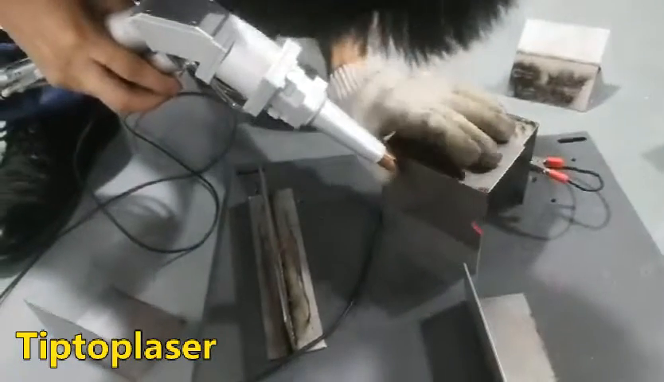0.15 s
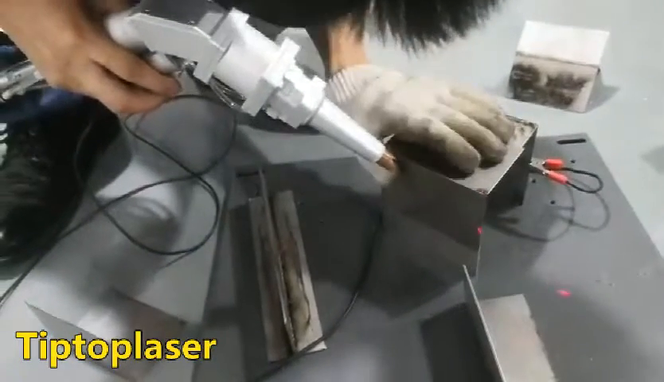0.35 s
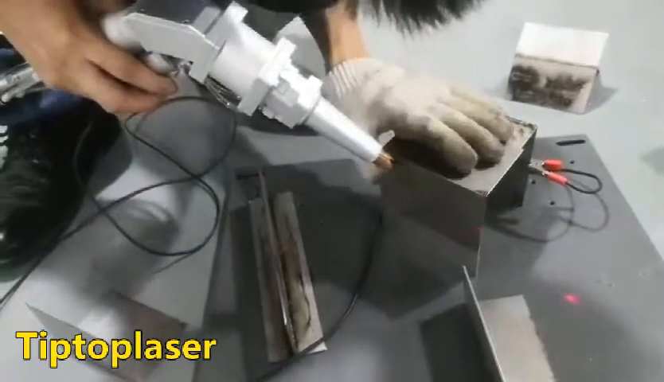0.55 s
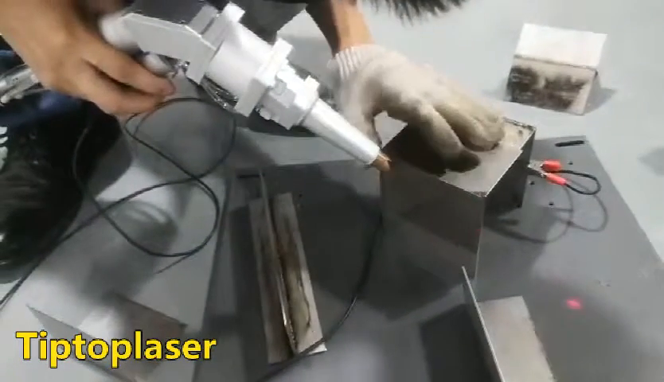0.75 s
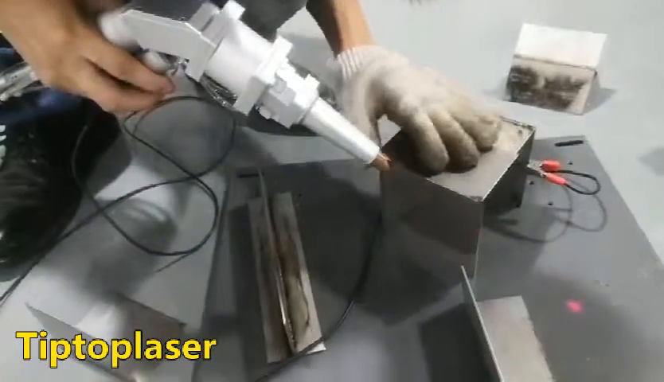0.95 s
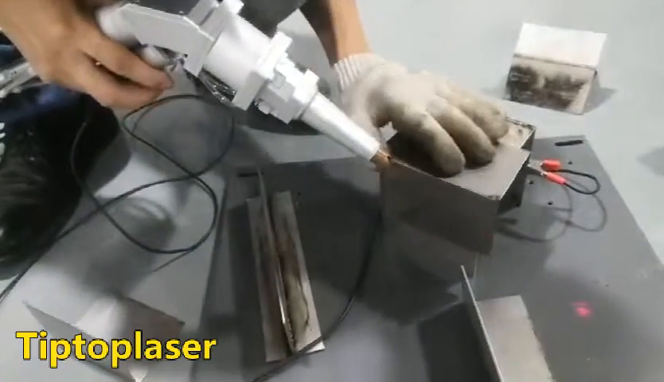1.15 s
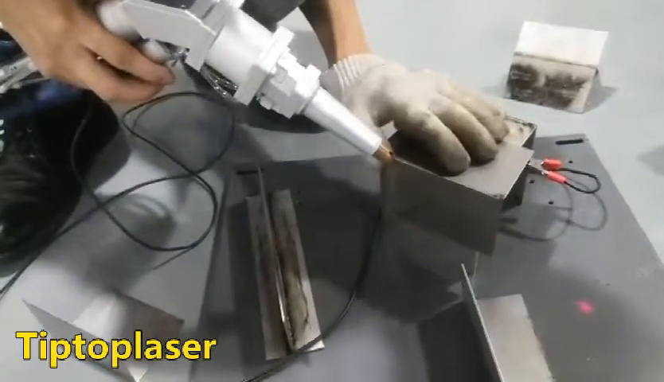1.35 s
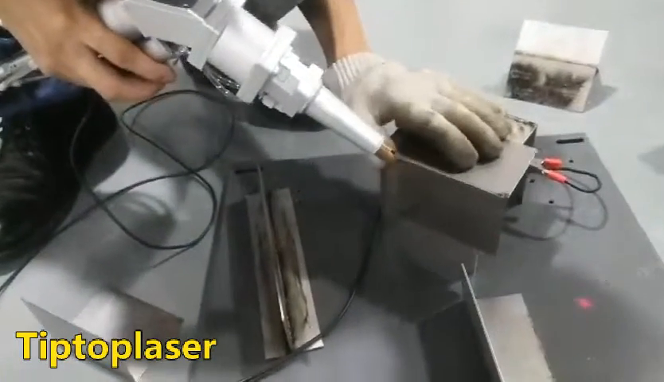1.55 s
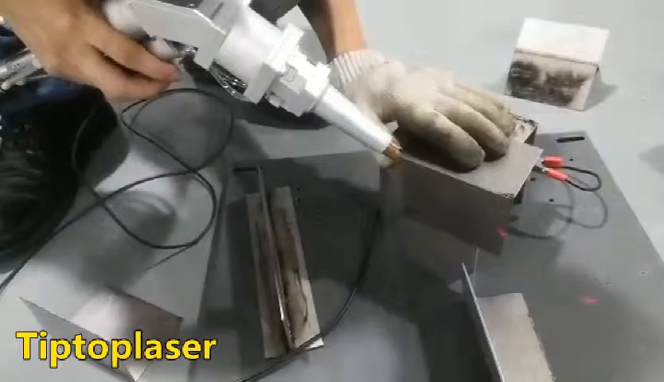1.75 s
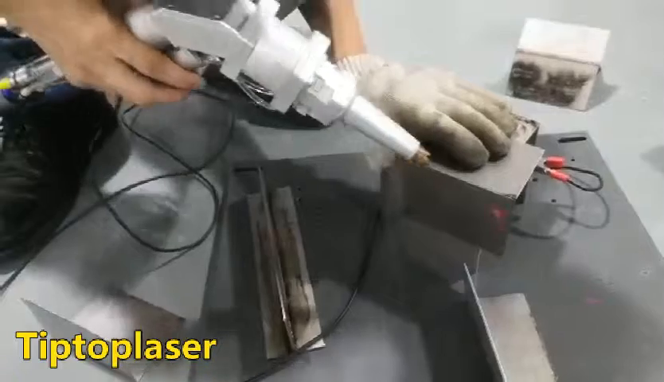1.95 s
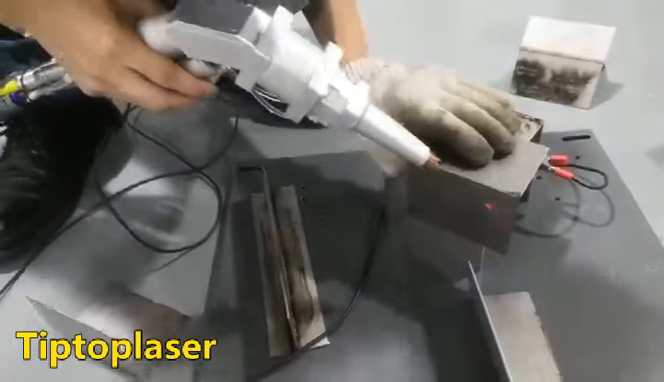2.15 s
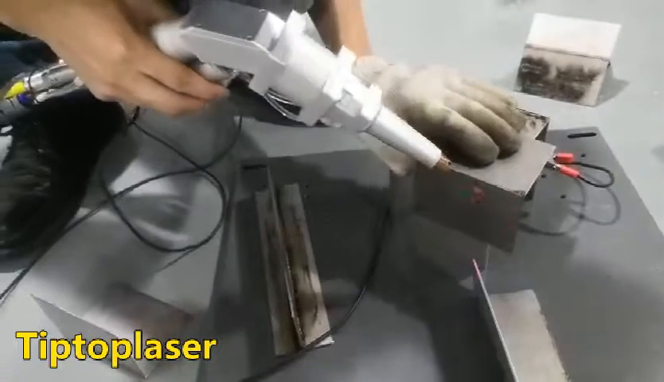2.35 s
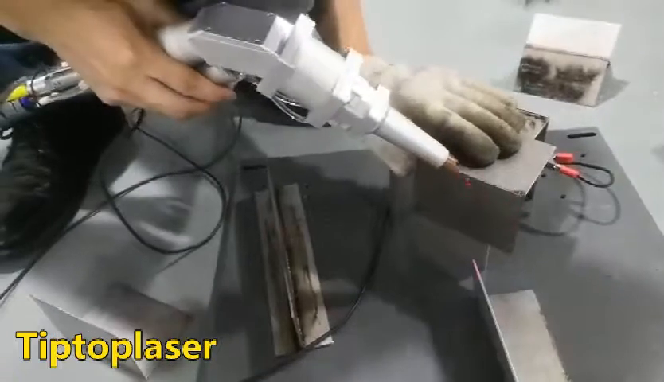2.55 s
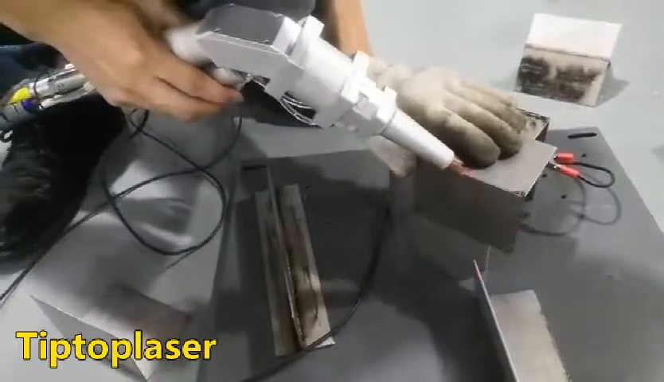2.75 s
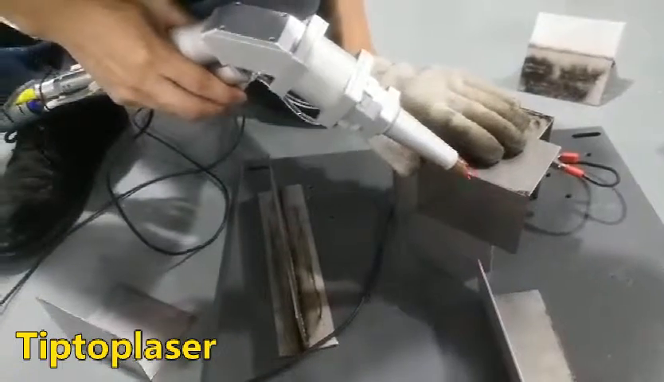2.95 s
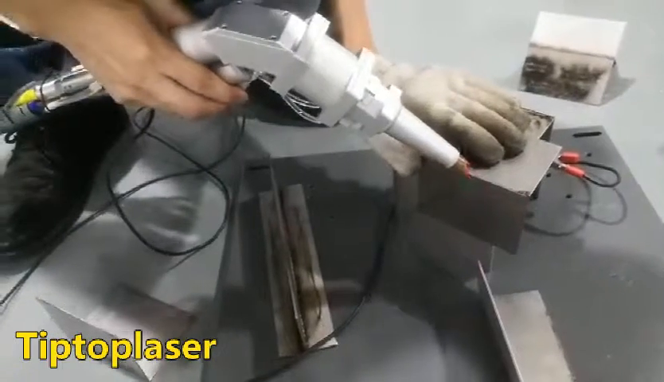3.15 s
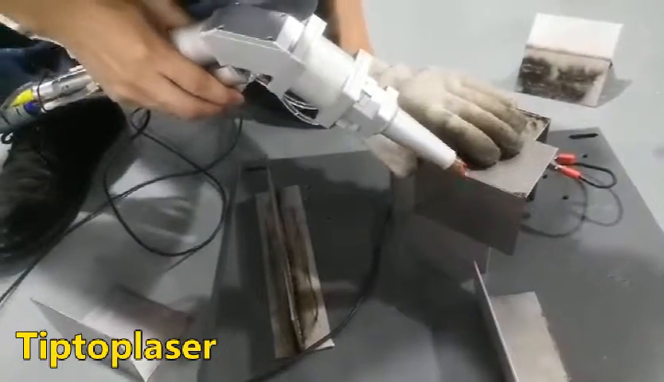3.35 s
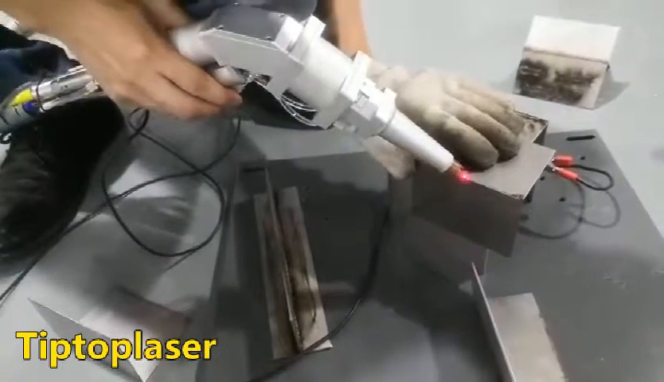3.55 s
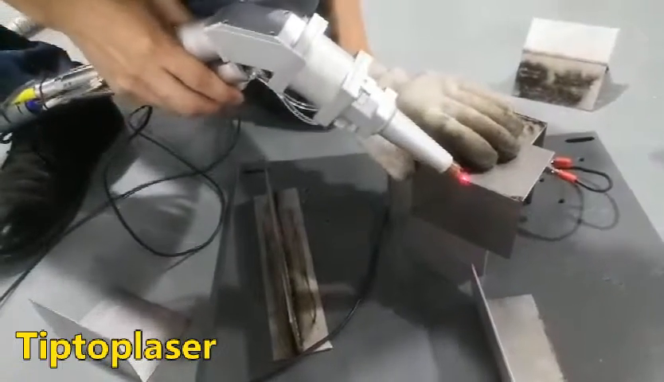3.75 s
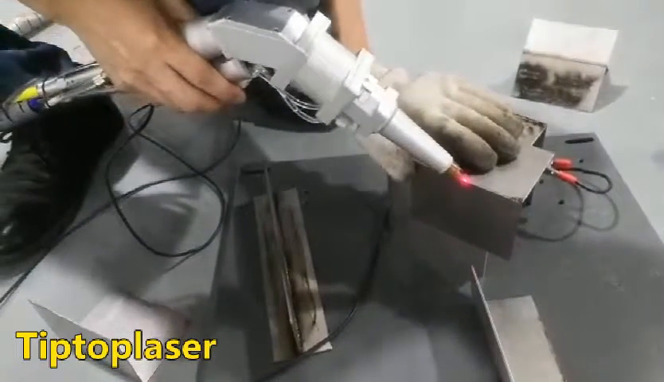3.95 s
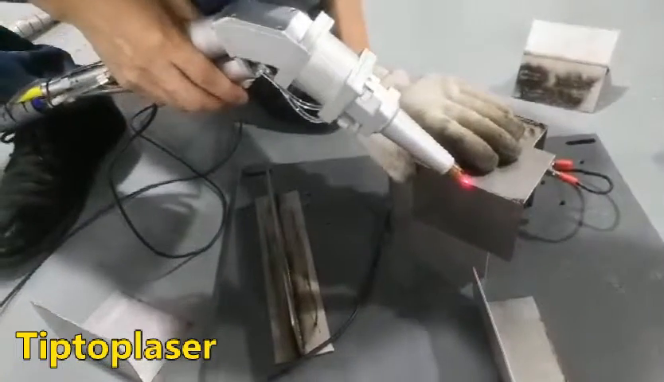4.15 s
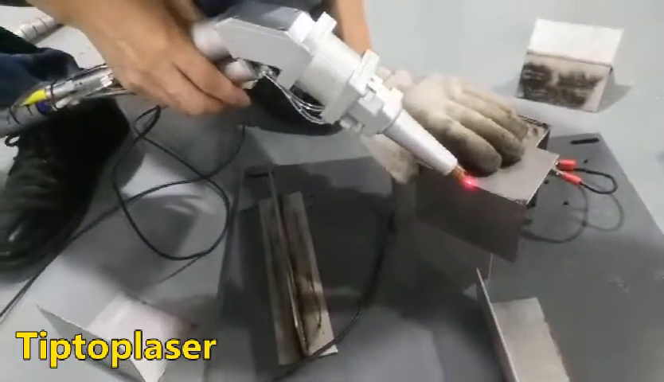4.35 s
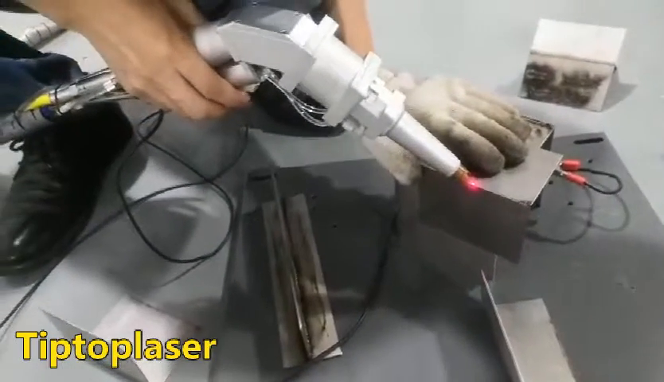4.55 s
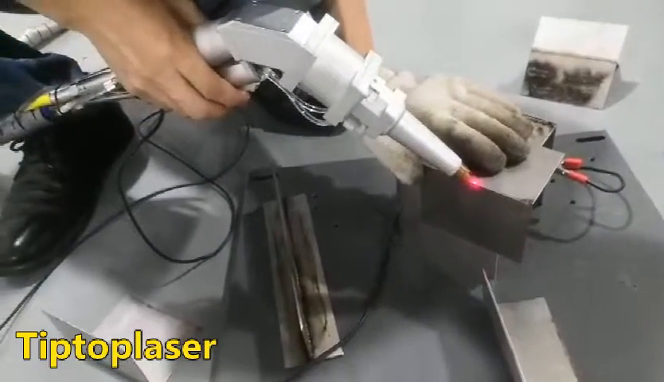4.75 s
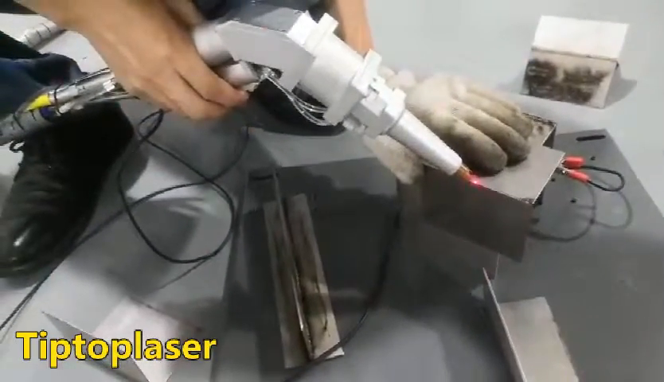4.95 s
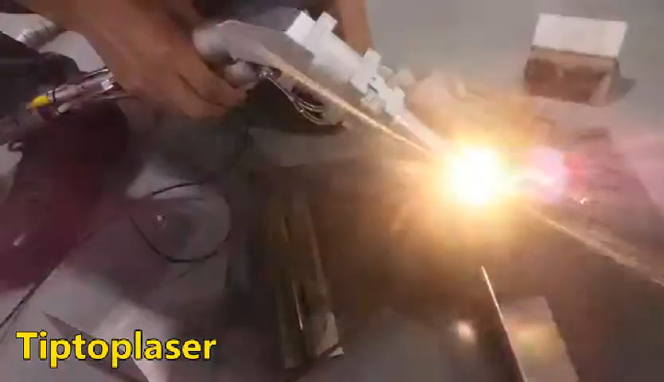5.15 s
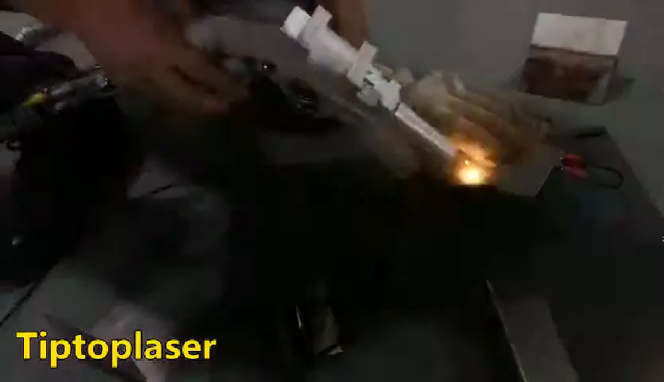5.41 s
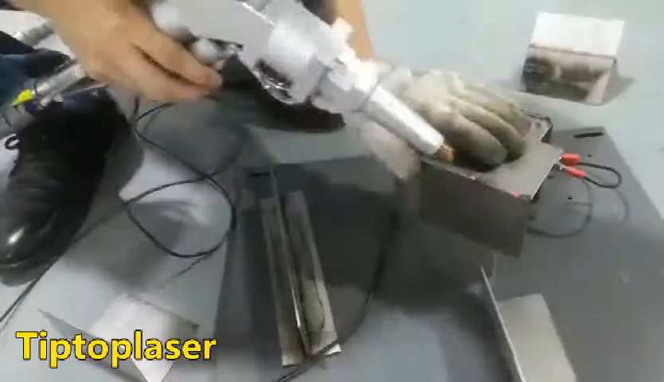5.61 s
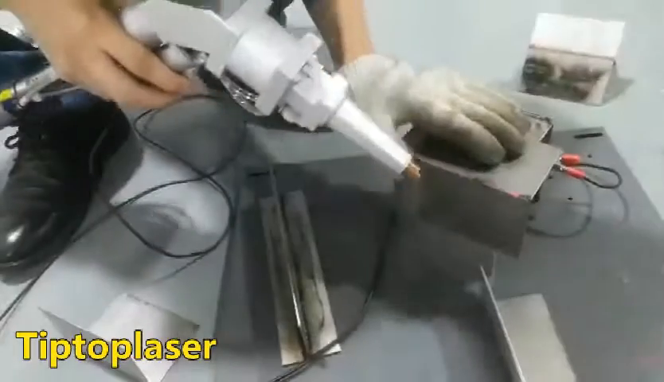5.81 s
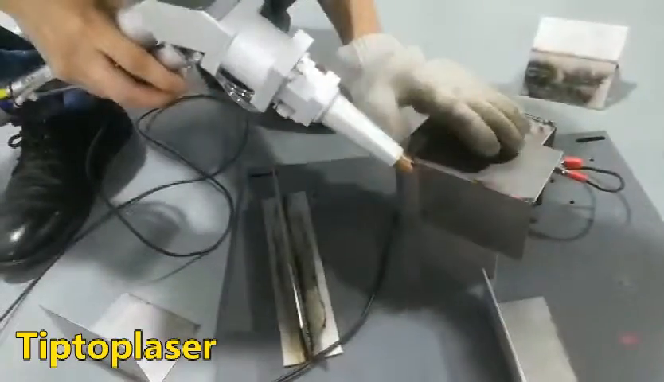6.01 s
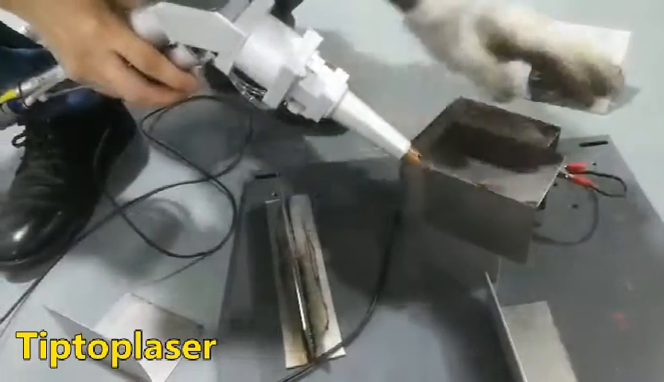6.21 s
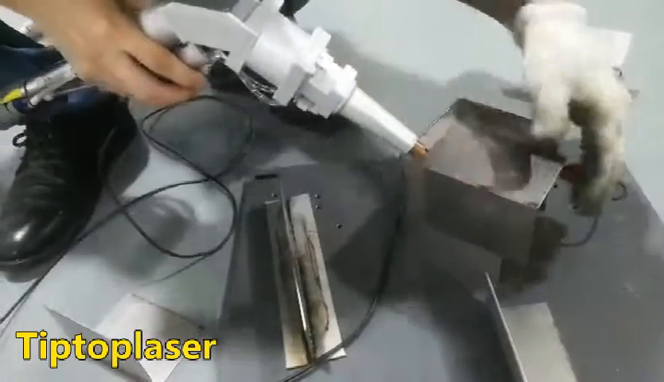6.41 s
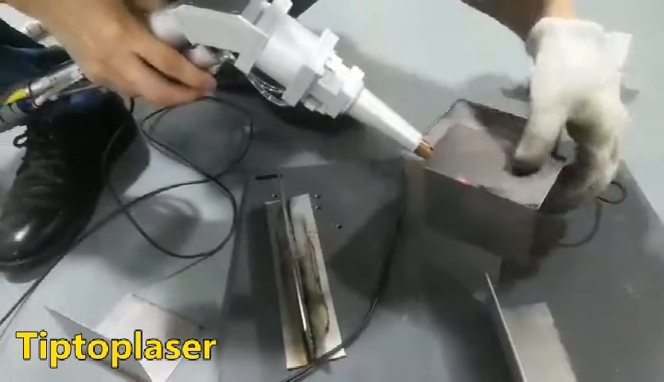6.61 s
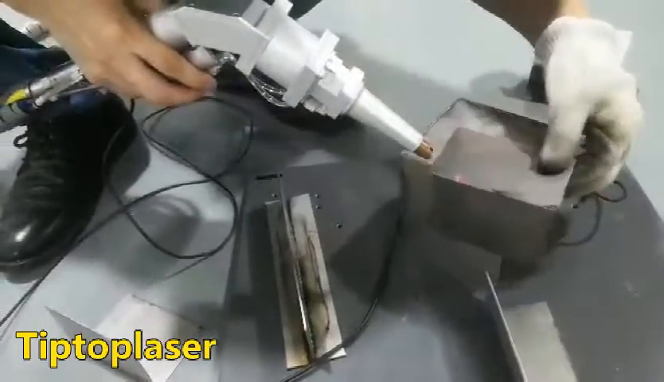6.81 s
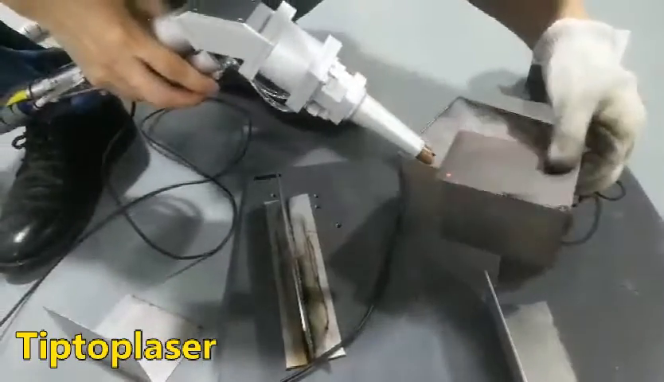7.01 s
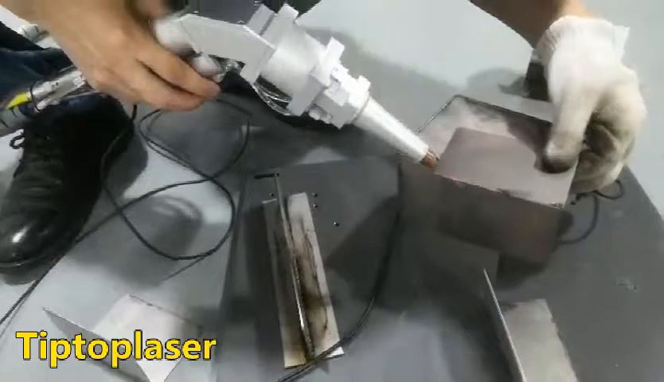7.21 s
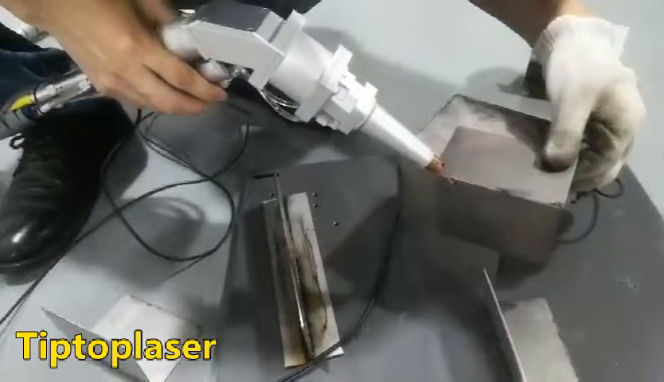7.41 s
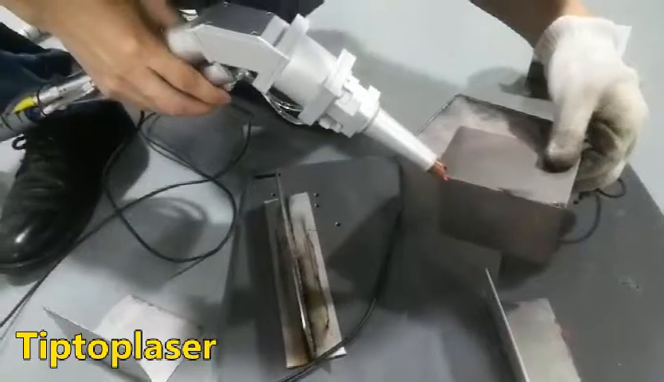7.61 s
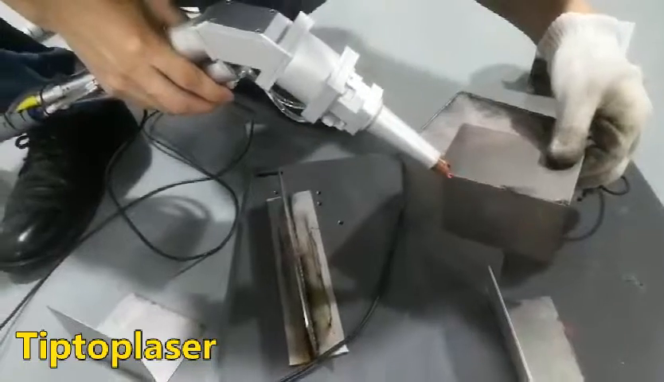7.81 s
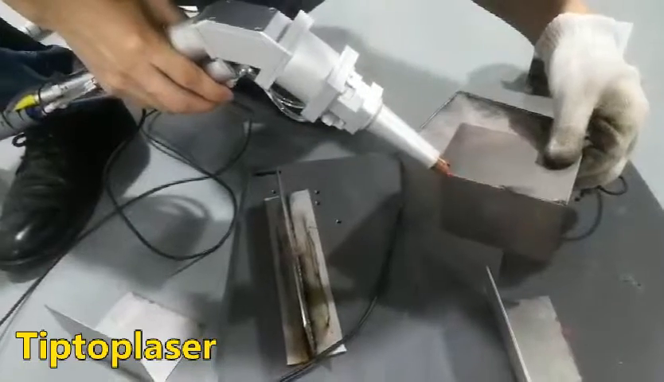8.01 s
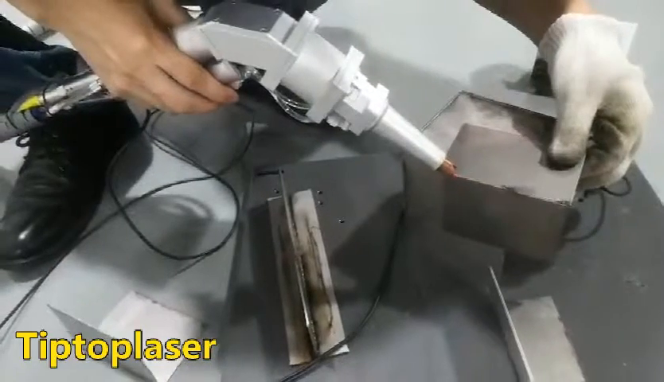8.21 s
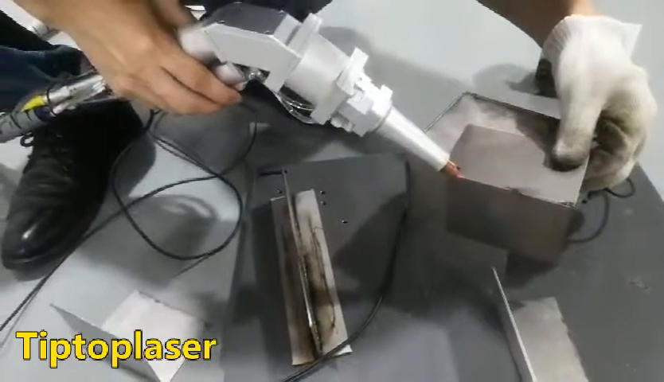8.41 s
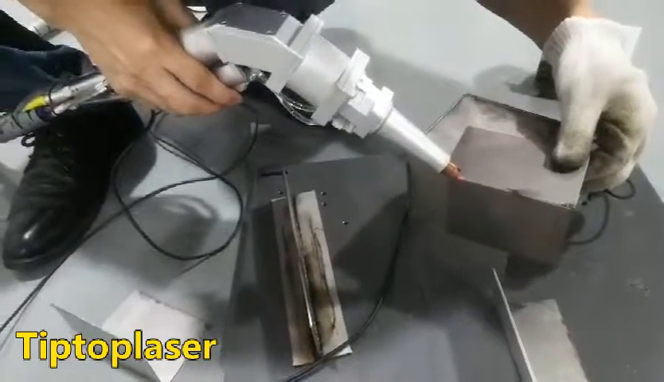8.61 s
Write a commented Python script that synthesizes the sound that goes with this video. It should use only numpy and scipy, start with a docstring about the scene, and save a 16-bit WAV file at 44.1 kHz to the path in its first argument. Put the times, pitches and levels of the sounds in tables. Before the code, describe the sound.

Throughout, a water chiller throbs with a deep hum around 100 to 150 Hz, pulsing nearly six times per second, with wavering motor drones and a soft fan rush, slightly louder at the very first instant. At about 0.95 to 1.05 s a steel box scrapes grittily and knocks, ringing brightly for a moment. At 1.3 s come quick dry taps and light rubbing, then faint single taps near 2.0 and 2.9 s. At 4.55 s a trigger clicks and thin gas starts; at 4.61 s a weld cracks and pops, then hisses, hollow and whistling through the nozzle, with a faint buzz. It flares fuller from 4.9 to 5.15 s, thins, wavers in pitch and stops sharply at 5.5 s. Faint gas bleeds away. Around 6.6 to 6.7 s the nozzle tip taps, scrapes and squeaks, ending in a small knock. Only the hum continues, in a short-tailed room.

```python
"""A workshop with a handheld laser welder, over the throbbing hum and fan rush of its water chiller.
First a stainless steel box scrapes and knocks, noise on ringing modes, and the nozzle taps and rubs held steel.
The trigger clicks and gas hisses; one weld cracks, then hisses for about a second through the resonant nozzle
tube, with a faint buzz of sines from the pulsed beam. The gas bleeds away, and at last the nozzle tip scrapes
and squeaks along the sheet. A short room tail follows the work."""
import sys
import numpy as np
from scipy import signal
from scipy.fft import rfft, irfft, next_fast_len
from scipy.io import wavfile
from scipy.ndimage import uniform_filter1d, map_coordinates

SR = 44100
rng = np.random.default_rng(int(sys.argv[2]) if len(sys.argv) > 2 else 0)


def generate_wav(sig):
    """Save sig (samples, or channels by samples) to the path in sys.argv[1] as 16-bit PCM at SR."""
    pcm = np.round(np.clip(np.atleast_2d(sig).T, -1, 1) * 32767).astype(np.int16)
    wavfile.write(sys.argv[1], SR, pcm)


N = 381465

SIDES = np.array([[1], [-1]])   # left, right
PUMP_TURNS_PER_S = 5.744
WELD_START_S, WELD_STOP_S, WELD_FALL_DB_PER_S = 4.614, 5.502, 420   # the beam is on
DRAG_RISE_DB_PER_S, TIP_FALL_DB_PER_S = 752, 450

# stereo width of the chiller: (frequency [Hz], left-right correlation [-1 to 1])
CHILLER_LIKENESS = [(60, 1), (140, 0.98), (300, 0.85), (620, -0.36), (1400, 0.37), (2400, -0.21),
                    (4300, -0.15), (7000, 0.15)]
# stereo balance of the steel: (frequency [Hz], left over right [dB])
STEEL_BALANCE = [(1300, -1), (2380, 4.5), (4400, -6), (8100, 5.5), (15000, -3)]
# nozzle tube resonances, near odd quarter waves:
# (frequency [Hz], width [Hz], level [dB], left over right [dB])
TUBE_MODES = [(2312, 91, 2, 7.5), (3912, 106, -1, -1), (5327, 103, 3.5, -1), (6930, 95, -4, -0.5),
              (8800, 67, -11.5, -2), (10680, 120, -16, 3), (12000, 230, -12, 0), (13500, 280, -14, 2),
              (15000, 200, -19, 0)]


def from_db(db):
    """Decibels to an amplitude factor."""
    return 10 ** (np.asarray(db) / 20)


def rms_one(x):
    """Scales a signal to an rms of 1."""
    return x / np.sqrt(np.mean(x ** 2) + 1e-20)


def seconds():
    """The time of every sample."""
    return np.arange(N) / SR


def in_time(rows):
    """Each column of a curve, at every sample."""
    s, *columns = np.transpose(rows)
    return [np.interp(seconds(), s, c) for c in columns]


def at_hz(points, hz):
    """A spectrum read on a log-frequency axis."""
    known_hz, values = np.transpose(points)
    return np.interp(np.log(hz + 1), np.log(known_hz), values)


def pan(side_db):
    """Left and right gains of constant power."""
    gains = from_db(0.5 * SIDES * side_db)
    return gains / np.sqrt(np.mean(gains ** 2, axis=0))


def widen(mid, side, alike):
    """Mixes two independent noises into left and right with a given correlation."""
    alike = np.clip(alike, -1, 1)
    return np.sqrt(1 + alike) * mid + np.sqrt(1 - alike) * side * SIDES


def drift(rate):
    """Smooth random wander of rms 1 that changes about rate times a second."""
    size = next_fast_len(N, real=True)
    hz = np.fft.rfftfreq(size, 1 / SR)
    smooth = rfft(rng.standard_normal(size)) / (1 + (hz / rate) ** 2)
    return rms_one(irfft(smooth, size)[:N])


def noise(spectrum, likeness=None, balance=None, repeats=None):
    """Stereo noise of rms 1 with a colour, a left-right likeness, a balance and a share that repeats with the pump."""
    size = next_fast_len(N, real=True)
    hz = np.fft.rfftfreq(size, 1 / SR)
    white = rfft(rng.standard_normal((2, size)))
    if repeats is not None:
        share = np.clip(at_hz(repeats, hz), 0, 1)
        bins = round(SR / PUMP_TURNS_PER_S / 2) + 1
        turn = rms_one(irfft(np.exp(2j * np.pi * rng.random((2, bins)))))   # one turn of flat noise
        looped = rfft(turn[:, np.arange(size) % turn.shape[1]])
        white = np.sqrt(1 - share) * white + np.sqrt(share) * looped
    mid, side = white
    both = widen(mid, side, 0 if likeness is None else at_hz(likeness, hz))
    gains = pan(0 if balance is None else at_hz(balance, hz))
    coloured = both * gains * from_db(at_hz(spectrum, hz))
    return rms_one(irfft(coloured, size)[:, :N])


def resonate(x, hz, width_hz):
    """A two-pole resonance with gain 1 on top."""
    r = np.exp(-np.pi * width_hz / SR)
    poles = [1, -2 * r * np.cos(2 * np.pi * hz / SR), r * r]
    return signal.lfilter(np.array([1, 0, -1]) * (1 - r * r) / 2, poles, x)


def narrow_noise(hz, width_hz):
    """Stereo noise in one resonance with steep skirts; rms 1."""
    white = rng.standard_normal((2, N))
    return rms_one(resonate(resonate(white, hz, width_hz), hz, 7 * width_hz))


def ring(force, hz, t60):
    """A mode of vibration: a unit click sets a decaying sine of starting height 1 ringing."""
    r, w = from_db(-60 / (t60 * SR)), 2 * np.pi * hz / SR
    return signal.lfilter([0, np.sin(w)], [1, -2 * r * np.cos(w), r * r], force + 1e-18)


def bursts(events, t60):
    """An envelope that jumps at each event and dies away."""
    kicks = np.zeros(N)
    for s, db in events:
        kicks[round(s * SR)] = from_db(db)
    decay = np.exp(-np.log(1000) / (t60 * SR))
    return signal.lfilter([1], [1, -decay], kicks + 1e-18)


def envelope(start, end, rise_s, fall_db_per_s):
    """Rises from the start, holds, and dies away after the end."""
    t = seconds()
    rise = 1 - np.exp(-np.maximum(t - start, 0) / rise_s)
    return rise * from_db(-fall_db_per_s * np.maximum(t - end, 0))


def drags(rows, fall_db_per_s):
    """Strength of friction: each drag swells, holds and fades at steady rates in dB."""
    t = seconds()
    levels = []
    for start, end, db in rows:
        rise_db = DRAG_RISE_DB_PER_S * np.maximum(start - t, 0)
        fall_db = fall_db_per_s * np.maximum(t - end, 0)
        levels.append(db - rise_db - fall_db)
    return from_db(np.max(levels, axis=0))


def workshop(x, t60=0.47, dull_hz=11000):
    """A diffuse, dull tail from the walls, different on each side."""
    t = np.arange(SR) / SR
    decay = np.exp(-np.log(1000) * t / t60) * (t > .006)
    tail = rng.standard_normal((2, SR)) * decay
    tail = signal.sosfilt(signal.butter(1, dull_hz, fs=SR, output="sos"), tail)
    return signal.fftconvolve(x, rms_one(tail) / np.sqrt(SR), axes=1)[:, :N]


def fans(level_db=-27.0, band_low_hz=450, band_high_hz=5000, start_db=14.5, settle_s=0.047):
    """Smooth rumble, partly alike on every pump turn, and a rush of air; the first moment is heard louder."""
    # colour of the fans and rumble: (frequency [Hz], level [dB])
    fan_colour = [(22, -23), (36, -20), (48, -4.5), (70, 2.5), (130, 2), (240, -7), (400, -11.5),
                  (800, -21), (1700, -19), (2500, -21.5), (3300, -29), (5600, -36), (10000, -54),
                  (15000, -66.5)]
    # stereo balance of the fans: (frequency [Hz], left over right [dB])
    fan_balance = [(400, 0), (700, -1.5), (2000, 2.5), (3200, -4.5), (4500, -2), (6200, -0.5)]
    # rumble that the pump drives, alike on every turn: (frequency [Hz], share of the power [0 to 1])
    rumble_repeats = [(450, 0.55), (900, 0.14)]
    rush = from_db(level_db) * noise(fan_colour, CHILLER_LIKENESS, fan_balance, rumble_repeats)
    band = signal.butter(1, [band_low_hz, band_high_hz], "band", fs=SR, output="sos")
    middle = signal.sosfilt(band, rush)
    opening_gain = from_db(start_db / (1 + (seconds() / settle_s) ** 2))
    return rush + middle * (opening_gain - 1)


def motor(whine_swing_db=3.5, whine_peak_turn=0.36):
    """Wavering drones of motor and housing, alike on both sides in the bass; the high ones swell with the pump."""
    # drones: (frequency [Hz], width [Hz], level before the swell [dB])
    drones = [(116.5, 3.4, -38.5), (300.05, 5.6, -39.5), (403, 8.6, -46.5), (622, 43, -46),
              (1135, 28, -52.5), (1360, 30, -51), (1483, 55, -51)]
    turns = PUMP_TURNS_PER_S * seconds()
    load_db = whine_swing_db * np.cos(2 * np.pi * (turns - whine_peak_turn))
    out = np.zeros((2, N))
    for hz, width_hz, db in drones:
        mid, side = narrow_noise(hz, width_hz)
        drone = rms_one(widen(mid, side, at_hz(CHILLER_LIKENESS, hz)))
        out += from_db(db + load_db * (hz > 1000)) * drone
    return out


def pump(uneven_db=0.5, jitter_s=0.00037, flutter_s=.00009, swell_s=0.04, swell_cycles=3.5):
    """Every turn repeats the same gliding swells of panel and pipe vibration, never quite alike; low ones last longer."""
    # what the pump shakes: (middle of the swell [turns], frequency [Hz], glide [Hz per s], peak level [dB])
    strokes = [(0.2097, 128.8, -750, -21), (.37, 120.6, 401, -28), (.67, 141.5, 850, -21.5),
               (.87, 110.7, -600, -29.5), (.45, 196.5, -900, -31.5), (.67, 300, 0, -30.5),
               (0.657, 449, 0, -39), (.83, 386, -1200, -39), (1, 392, 0, -41), (.38, 1360, 0, -37),
               (.5, 1470, 0, -40), (.04, 1135, 0, -41.5)]
    out = np.zeros((2, N))
    for middle, hz, glide, db in strokes:
        uneven_time = seconds() + jitter_s * drift(4.1) + flutter_s * drift(37)
        turns = uneven_time * PUMP_TURNS_PER_S
        from_middle_s = ((turns - middle + .5) % 1 - .5) / PUMP_TURNS_PER_S
        length = swell_s + swell_cycles / hz
        shape = np.cos(np.pi * np.clip(from_middle_s / length, -.5, .5)) ** 2
        swell = shape * from_db(db + uneven_db * drift(8.0))
        cycles = (hz + glide * from_middle_s / 2) * from_middle_s
        # short waves reach the two sides out of step
        apart = np.arccos(np.clip(at_hz(CHILLER_LIKENESS, hz), -1, 1)) / 2
        out += swell * np.sin(2 * np.pi * cycles + apart * SIDES)
    return out


def gun(open_s=4.545, valve_s=0.0027, trigger_db=-34.5, gas_db=-48, afterflow_db=-59.5):
    """The trigger clicks as it opens the shielding gas, which hisses thinly; after the weld the hose bleeds empty."""
    # colour of click and gas: (frequency [Hz], level [dB])
    click_colour = [(2000, -2), (5000, 3), (8000, 9), (15000, -11)]
    click = bursts([(open_s, trigger_db)], t60=0.1)
    flow = from_db(gas_db) * envelope(open_s, WELD_STOP_S, valve_s, WELD_FALL_DB_PER_S)
    afterflow = from_db(afterflow_db) * envelope(open_s, WELD_STOP_S, valve_s, fall_db_per_s=4)
    return (click + flow + afterflow) * noise(click_colour)


def taps(t60=0.068, dull_hz=11000):
    """The nozzle meets steel that the glove holds down: short, dry knocks and light rubbing on damped modes."""
    # taps: (time [s], level [dB])
    tap_times = [(1.32, -29), (1.3278, -26), (1.338, -27), (2.018, -38), (2.932, -39), (6.573, -33)]
    # light rubs around them: (full strength from [s], until [s], level [dB])
    rubs = [(1.302, 1.31, -42), (1.438, 1.472, -44)]
    # dry modes of the held steel: (frequency [Hz], width [Hz], level [dB])
    dry_modes = [(2540, 340, 1), (4060, 360, -7.5), (5620, 280, 3), (6630, 130, -3), (7270, 160, -7),
                 (8050, 140, -24)]
    dull = signal.butter(1, dull_hz, fs=SR, output="sos")
    white = signal.sosfilt(dull, rng.standard_normal((2, N)))
    body = np.zeros((2, N))
    for hz, width_hz, db in dry_modes:
        body += pan(at_hz(STEEL_BALANCE, hz)) * from_db(db) * resonate(white, hz, width_hz)
    return (bursts(tap_times, t60) + drags(rubs, TIP_FALL_DB_PER_S)) * rms_one(body)


def scrape(grain_db=2.2, slip_hz=300, waver=.017, waver_hz=90, tip_slip_s=6.688, bend_s=.008):
    """The tip slides along the sheet: grainy friction, and squeaks that grow with the pressure and bend as it slips."""
    # slides of the tip: (full strength from [s], until [s], level [dB])
    tip_drags = [(6.581, 6.586, -42), (6.634, 6.645, -38), (6.662, 6.675, -29.5), (6.693, 6.71, -33.5)]
    # colour of its friction: (frequency [Hz], level [dB])
    tip_colour = [(1200, -6.5), (2450, -2), (3100, -1.5), (3700, -11), (4420, 1), (4800, -7), (5700, -5),
                  (8600, -13), (14000, -28)]
    # squeaks: (frequency [Hz], peak level over the friction [dB], power of the pressure [exponent],
    # bend as the tip slips [Hz])
    squeaks = [(2470, 1, 2.6, -2), (4370, 1.5, 1, 70), (5420, -5, .9, 330)]
    friction = drags(tip_drags, TIP_FALL_DB_PER_S)
    pressure = friction / friction.max()
    slipped = (1 + np.tanh((seconds() - tip_slip_s) / bend_s)) / 2
    out = pressure * noise(tip_colour)
    for hz, db, power, bend_hz in squeaks:
        pitch_hz = hz * (1 + waver * drift(waver_hz)) + bend_hz * slipped
        cycles = np.cumsum(pitch_hz) / SR
        tone = np.sin(2 * np.pi * cycles + np.array([[0], [1]]))   # the right leads by 1 radian
        out += pan(at_hz(STEEL_BALANCE, hz)) * from_db(db) * pressure ** power * tone
    return friction.max() * from_db(grain_db * drift(slip_hz)) * out


def steel(grain_db=4, slip_hz=300, friction_db=-2.0, ring_db=-34.0, split_hz=20, crowd_db=-22, crowd_t60=0.19):
    """The box is shifted: stick and slip give grainy friction and knocks, and both set it ringing; a last knock
    comes as the nozzle tip leaves the sheet."""
    # the box edge dragged over steel: (full strength from [s], until [s], level [dB])
    box_drags = [(.958, 1.052, -29)]
    # knocks on the box, at first as it catches while shifted, the last as the nozzle tip leaves the sheet:
    # (time [s], level [dB])
    knocks = [(.9603, -27), (.9678, -24), (.9827, -20), (1.0077, -17), (1.0401, -28), (1.051, -30),
              (6.712, -32)]
    # colour of the edge's friction: (frequency [Hz], level [dB])
    box_colour = [(300, -25), (600, 1), (1950, -5), (2400, 3), (3100, -4.5), (4800, -2), (5450, 10),
                  (6100, -4), (9000, -8), (14500, -11)]
    # modes of the box: (frequency [Hz], level [dB], t60 [s])
    box_modes = [(2280, -3, .6), (3360, -15, 1.1), (3650, -9, .2), (4310, -5, .4), (5255, -9.5, .45),
                 (5530, 7, .035), (5870, -1, .06), (6360, -4, .25), (6528, 2, .1), (7290, -8, .27),
                 (7485, 0, .22), (7680, -5, .36), (8780, -9, .3)]
    likeness = [(4500, 0.64), (9000, .1)]   # (frequency [Hz], left-right correlation)
    grain = from_db(grain_db * drift(slip_hz))
    contact = drags(box_drags, fall_db_per_s=900) * grain + bursts(knocks, t60=0.044)
    friction = from_db(friction_db) * contact * noise(box_colour, likeness, STEEL_BALANCE)
    force = from_db(ring_db) * contact * rng.standard_normal((2, N))
    rings = np.zeros((2, N))
    for k, (hz, db, t60) in enumerate(box_modes):
        # each mode has a slightly higher partner that dies twice as fast; it is struck at the mirrored moments,
        # counted back from the end
        wall = ring(force, hz, t60)
        opposite = ring(force[::-1], hz + split_hz * rng.uniform(1, 2.02), t60 / 2)
        rings += (-1) ** k * pan(at_hz(STEEL_BALANCE, hz)) * from_db(db) * (wall + opposite)
    crowd = np.zeros((2, N))   # weak modes among and above the strong ones
    for hz in rng.uniform(4500, 14500, size=34):
        crowd += rng.choice([-1, 1]) * ring(force, hz, crowd_t60)
    return friction + rings + from_db(crowd_db) * crowd


def ignition(pop_db=-15, pop_t60=0.021, side_db=4, crack_db=-28):
    """The first flash of vapour cracks and pops in the tube's lowest resonance."""
    flash = np.zeros(N)
    flash[round(WELD_START_S * SR)] = 1
    pop = pan(side_db) * from_db(pop_db) * ring(flash, TUBE_MODES[0][0], pop_t60)
    crack = bursts([(WELD_START_S, crack_db)], t60=0.045) * rng.standard_normal((2, N))
    return pop + crack


def nozzle(boil, flare_end_s, tube_db=-25, lowest_db=-27.5, lowest_fall_db_per_s=20, throb_db=-0.3,
           throb_per_s=9.7, throb_peak_s=4.68, diffuse=0.25, waver=.006, waver_hz=60):
    """The hiss sounds the tube's resonances; the strongest one throbs, wavers and bends as the mouth moves."""
    # the tube's mouth moves over the steel: (time [s], pitch of the strongest resonance [ratio],
    # tube level [dB], lean to the resonance above the strongest and away from the one below [dB])
    mouth = [(4.65, 1.002, -1, -1), (4.76, 1.002, 0, 3), (4.93, 1, -.5, 0), (5.275, .985, -4.5, 0),
             (5.315, 1.045, -8, -3), (5.385, 1.018, -3.5, -1), (5.425, 1.028, -.5, -.5),
             (5.51, 1.016, -2.5, -3.5)]
    # how the tube's sound reaches the two sides: (frequency [Hz], lead of the left [radians])
    side_phase = [(2306, -1.5), (5400, -1), (7000, -2.5), (8800, -2), (10800, -4)]
    strongest = 2
    t = seconds()
    pitch, mouth_db, lean_db = in_time(mouth)
    throb = from_db(throb_db * np.cos(2 * np.pi * throb_per_s * (t - throb_peak_s)))
    out = np.zeros((2, N))
    for k, (hz, width_hz, db, side_db) in enumerate(TUBE_MODES):
        ratio = hz / TUBE_MODES[strongest][0]
        if k == 0:
            # the lowest speaks at once and sags after the flare
            drive = from_db(lowest_db - lowest_fall_db_per_s * np.maximum(t - flare_end_s, 0))
        else:
            above = k - strongest
            drive = boil * from_db(tube_db + mouth_db + lean_db * above * (abs(above) == 1))
        clock = np.arange(N)
        if k == strongest:
            clock = np.cumsum(pitch + waver * drift(waver_hz))   # runs faster when the tube is sharp
            drive = drive * throb
        mid, side = narrow_noise(hz, width_hz)
        left, right = rms_one(mid + diffuse * ratio * side * SIDES)   # short waves differ more between the sides
        lead = at_hz(side_phase, hz) / (2 * np.pi * hz) * SR   # in samples
        left = map_coordinates(left, [clock + lead], order=3)
        right = map_coordinates(right, [clock], order=3)
        out += pan(side_db) * from_db(db) * drive * np.array([left, right])
    return out


def weld(buzz_db=-12.5, sputter_db=1.06, sputter_hz=250, beam_pulse_hz=1000, build_s=.04,
         plume_db=-24.5, plume_fall_db_per_s=73, flare_db=-20.5, copy_delay_s=0.00069, copy_db=-6):
    """The boiling metal hisses, hollow except in the flare, and sounds the nozzle tube; the pulsed beam adds a buzz."""
    # colour of the vapour plume: (frequency [Hz], level [dB])
    plume_colour = [(1000, -19), (1700, -7), (2100, 2), (3100, -2.5), (4300, -0.5), (5100, 8.5), (5800, -2),
                    (6700, 7), (7800, -2), (9300, 1.5), (9900, -12), (10600, -4.5), (12000, -4.5),
                    (15000, -7)]
    # its stereo balance: (frequency [Hz], left over right [dB])
    plume_balance = [(2400, 0), (3300, -3), (4800, -6), (5700, -3), (6450, 9), (7100, -8), (9000, -3),
                     (10500, 4), (14000, -2)]
    # its stereo width: (frequency [Hz], left-right correlation [-1 to 1])
    plume_likeness = [(6100, 0.2), (6800, -0.79), (14000, -0.1)]
    # overtones of the beam's pulse rate: (multiple [number], level [dB], left over right [dB])
    beam_lines = [(2, -3.5, 8), (5, -3, -6), (6, -6, 0), (9, -5, -8)]
    flare_start_s, flare_end_s = 4.883, 5.154
    beam_on = envelope(WELD_START_S, WELD_STOP_S, 0.0015, WELD_FALL_DB_PER_S)
    # the melt takes a moment to boil; it stops with the beam
    boil = envelope(WELD_START_S, WELD_STOP_S, build_s, 0)
    # mid-weld the plume flares up, then dies down
    flare = envelope(flare_start_s, flare_end_s, 0.0055, plume_fall_db_per_s)
    steady = envelope(WELD_START_S, flare_end_s, build_s, plume_fall_db_per_s)
    vapour = from_db(plume_db) * steady + from_db(flare_db) * flare
    buzz = np.zeros((2, N))
    for multiple, db, side_db in beam_lines:
        cycles = multiple * beam_pulse_hz * seconds() + rng.random()
        buzz += pan(side_db) * from_db(db) * np.sin(2 * np.pi * cycles)
    hiss = noise(plume_colour, plume_likeness, plume_balance)
    # outside the flare a slightly delayed, inverted copy is added to the hiss, which makes it hollow
    delayed = from_db(copy_db) * np.roll(hiss, round(copy_delay_s * SR), axis=1)
    plume = vapour * (hiss - (1 - flare) * delayed + from_db(buzz_db) * buzz)
    sputter = from_db(sputter_db * drift(sputter_hz))
    return beam_on * sputter * (plume + nozzle(boil, flare_end_s))


def scene(room_db=-17):
    """The work close by with its room tail, the chiller further off without one."""
    chiller = fans() + motor() + pump()
    work = gun() + taps() + scrape() + steel() + ignition() + weld()
    return chiller + work + from_db(room_db) * workshop(work)


def record(dry, threshold_db=-23.0, squeeze=0.25, cutoff_hz=15150):
    """Gain control ducks the loudest passages a little; the top is cut steeply."""
    power = uniform_filter1d(np.mean(dry ** 2, axis=0), size=SR // 10)
    level_db = 10 * np.log10(power + 1e-12)
    gain = from_db(-squeeze * np.maximum(level_db - threshold_db, 0))
    fade_in = np.minimum(seconds() / .003, 1)
    top_cut = signal.ellip(12, .1, 80, cutoff_hz, fs=SR, output="sos")
    return signal.sosfilt(top_cut, dry * gain * fade_in)


dry = scene()
out = record(dry)
generate_wav(out)
```